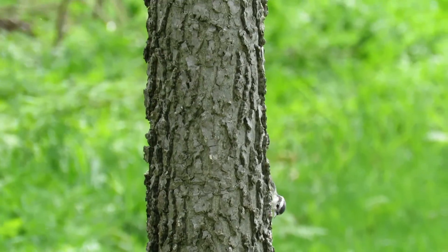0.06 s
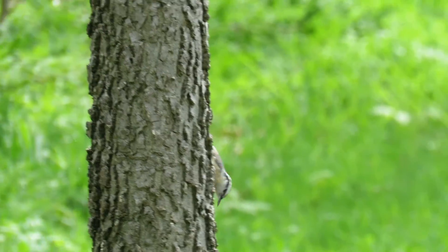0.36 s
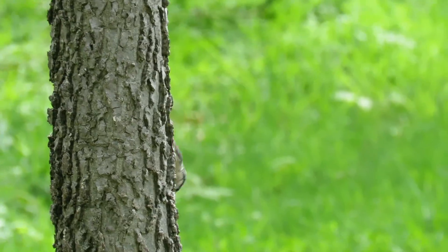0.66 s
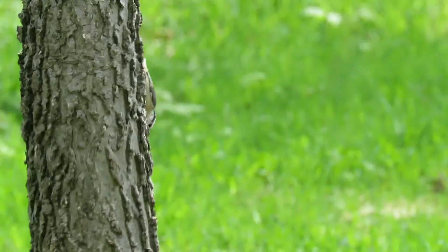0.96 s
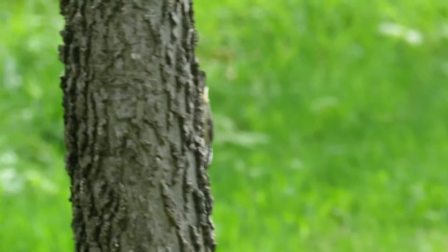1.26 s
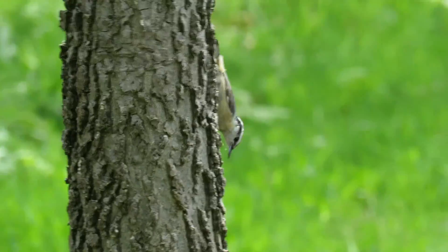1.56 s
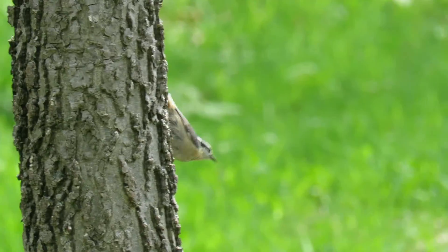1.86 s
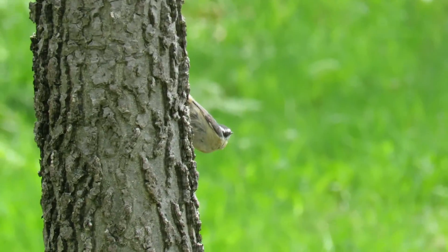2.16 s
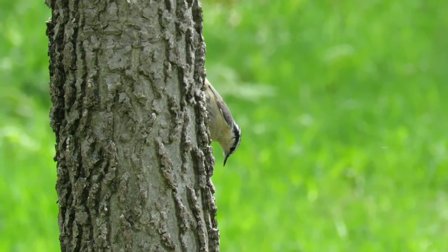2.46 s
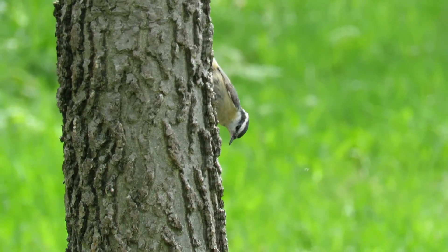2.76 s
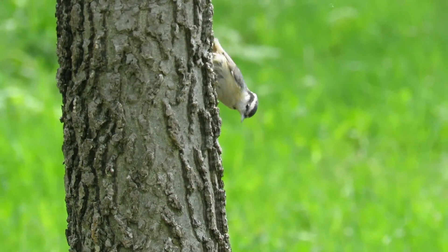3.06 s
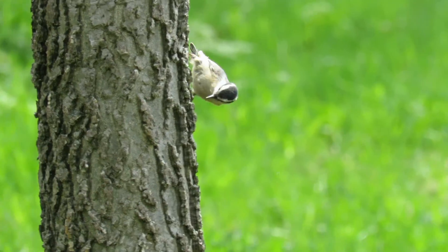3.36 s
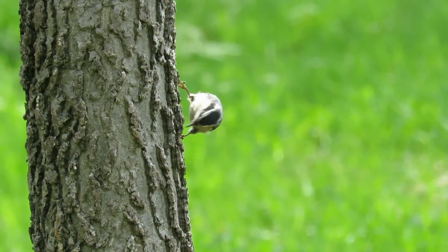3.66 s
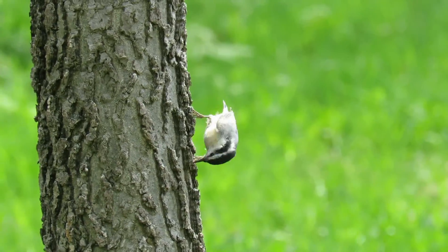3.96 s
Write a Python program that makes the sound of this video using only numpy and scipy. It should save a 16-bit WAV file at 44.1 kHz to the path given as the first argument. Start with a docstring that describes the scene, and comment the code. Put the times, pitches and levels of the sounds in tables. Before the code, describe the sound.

Light taps and clicks of camera handling over low outdoor rumble and faint bird chirps.

```python
"""Handling a camera in a garden

Fingers tap and slide on a hand-held camera: each impact excites the damped modes of its plastic
shell, and a small hard part ticks against it. Songbirds whistle and buzz, their calls scattered
by the trees. Behind them lie a low outdoor rumble, the wash of far traffic, a hiss of leaves and
air, and the very faint whine of the camera's mechanism."""
import sys
import numpy as np
from scipy import signal
from scipy.fft import rfft, irfft, next_fast_len
from scipy.io import wavfile
from scipy.ndimage import uniform_filter1d, map_coordinates

SR = 44100
rng = np.random.default_rng(int(sys.argv[2]) if len(sys.argv) > 2 else 0)


def wav_out(sig):
    """Save sig, one row per channel (or a flat mono array), as 16-bit PCM at SR to the path in sys.argv[1]."""
    wavfile.write(sys.argv[1], SR, np.round(np.clip(np.atleast_2d(sig).T, -1, 1) * 32767).astype(np.int16))


N = 176400


def amp(db):
    """Amplitude ratio of a level in decibels."""
    return 10 ** (np.asarray(db) / 20)


def unit_rms(x):
    """Normalisation to unit mean power."""
    return x / np.sqrt(np.mean(x ** 2) + 1e-20)


def on_log_axis(points, hz):
    """Interpolation of (frequency_hz, value) points over log frequency."""
    knots_hz, values = np.transpose(points)
    return np.interp(np.log(hz + 1), np.log(knots_hz + 1), values)


def curve(rows):
    """Linear interpolation of (time_s, value) rows at every sample."""
    return np.interp(np.arange(N) / SR, *np.transpose(rows))


def wobble(rate_hz):
    """Smooth random modulation: a spline through rate_hz Gaussian knots a second."""
    knots = rng.standard_normal(int(N * rate_hz / SR) + 4)
    return map_coordinates(knots, [np.arange(N) * rate_hz / SR])


def filtered(x, response):
    """Zero-phase filtering: the spectrum is multiplied by response(hz)."""
    n = x.shape[-1]
    padded = next_fast_len(n + 4096)
    return irfft(rfft(x, padded) * response(np.fft.rfftfreq(padded, 1 / SR)), padded)[..., :n]


def pan(db):
    """Level-difference panning: left exceeds right by db."""
    return amp(np.array([[db], [-db]]) / 2)


def add(out, start_s, x):
    """Superposition of x on out from start_s."""
    part = out[..., max(round(start_s * SR), 0):][..., :x.shape[-1]]
    part += x[..., :part.shape[-1]]


# Left-right coherence of the noise: frequency_hz, correlation
COHERENCE = [(110, 1), (200, .92), (300, .6), (430, .25), (830, .53), (1600, .2), (3000, .1), (6000, -.1),
             (11400, -.17)]

def noise_field(spectrum, patchy_db):
    """Partly coherent stereo noise of unit rms, its gain varying in time-frequency patches."""
    cells = signal.stft(rng.standard_normal((2, N)), nperseg=512)[2]
    patches = uniform_filter1d(rng.standard_normal(cells.shape[1:]), size=5, axis=0)
    patches = uniform_filter1d(patches, size=14, axis=1)
    pair = signal.istft(cells * amp(patchy_db * unit_rms(patches)), nperseg=512)[1][:, :N]

    def mid_side_gains(hz):
        angle = np.arccos(on_log_axis(COHERENCE, hz)) / 2
        return amp(on_log_axis(spectrum, hz)) * [np.cos(angle), np.sin(angle)]
    mid, side = filtered(pair, mid_side_gains)
    return unit_rms(np.array([mid + side, mid - side]))


# Spectrum of the rumble: frequency_hz, gain_db
RUMBLE_SPECTRUM = [(12, -38), (20, -16), (91, 2), (119, -0.5), (206, -13.5), (282, -13.5), (400, -17.5),
                   (520, -53), (880, -120)]
# Its slow drift: time_s, level_db
RUMBLE_DRIFT = [(0, -50), (.6, -49), (1.2, -50.5), (2.1, -53), (2.6, -53), (3.4, -54), (3.75, -51.5),
                (4, -54.5)]

def rumble():
    """Low outdoor noise: long waves reach both channels nearly in phase."""
    return amp(curve(RUMBLE_DRIFT) + 0.35 * wobble(5.3)) * noise_field(RUMBLE_SPECTRUM, patchy_db=0.2)


# Spectrum of far traffic: frequency_hz, gain_db
TRAFFIC_SPECTRUM = [(90, -24), (150, -4), (200, -6), (290, -5.5), (390, -9.5), (520, -10.5), (680, -8.5),
                    (840, -6), (1040, -8), (1250, -12.5), (1600, -18), (1900, -24), (2400, -27),
                    (3200, -55.5)]
# Its slow drift: time_s, relative_level_db
TRAFFIC_DRIFT = [(0.0, -58), (0.83, -54.5), (1.38, -56), (1.78, -55.5), (2.27, -55.5), (3.55, -57.5),
                 (4.0, -55.5)]

def traffic(gain_db=1):
    """Distant vehicles sum incoherently to a wash of noise with little treble."""
    level_db = curve(TRAFFIC_DRIFT) + gain_db + 0.65 * wobble(8.8)
    return amp(level_db) * noise_field(TRAFFIC_SPECTRUM, patchy_db=1.32)


# Spectrum of leaves and air: frequency_hz, gain_db
LEAF_SPECTRUM = [(1500, -30), (2200, -5.5), (3000, 2), (4000, -6), (5000, -5.5), (6200, -13.5),
                 (7400, -11.5), (8300, -17), (9200, -16), (11300, -23), (11800, -45)]

def leaves(level_db=-70):
    """Leaves and air give a faint broadband hiss."""
    return amp(level_db) * noise_field(LEAF_SPECTRUM, patchy_db=2.0)


# Tones of the camera's mechanism: pitch_hz, level_db
WHINE_TONES = [(5529, -95), (6648, -105), (7432, -103), (8151, -104)]

def camera_whine(jitter_rad=0.89):
    """The mechanism emits a line spectrum, each line broadened by random phase modulation."""
    t = np.arange(N) / SR
    return sum(amp(db) * np.sqrt(2) * np.sin(2 * np.pi * hz * t + jitter_rad * wobble(27))
               for hz, db in WHINE_TONES)


def tree_echo(x, t60_s=0.58, build_s=0.0033):
    """Scattering from trunks and leaves: convolution with exponentially decaying noise."""
    t = np.arange(SR) / SR
    tail = rng.standard_normal((2, SR)) * amp(-60 * t / t60_s) * (1 - np.exp(-t / build_s))
    return signal.fftconvolve(x[None], tail / np.linalg.norm(tail[0]), axes=1)[:, :N]


# Far buzzy calls: start_s, length_s, centre_hz, half_width_hz, level_db
BUZZ_CALLS = [(0.099, 0.16, 3400, 350, -77), (0.622, 0.42, 4850, 400, -74), (1.077, 0.19, 3420, 230, -72),
              (1.724, 0.24, 4560, 423, -68), (1.682, 0.26, 3350, 304, -68.5),
              (2.029, 0.1, 3550, 220, -68.5), (2.471, 0.29, 3750, 280, -76.5),
              (3.2, 0.11, 3300, 550, -66.5), (3.411, 0.19, 3670, 300, -69.5), (3.849, 0.41, 4550, 600, -77),
              (3.87, 0.38, 3170, 350, -73)]

def bird_buzzes(rise_share=0.28, onset_boost_db=2):
    """Rough calls, blurred by the trees, arrive as swells of narrow-band noise."""
    out = np.zeros((2, N))
    for start_s, length_s, centre_hz, half_width_hz, db in BUZZ_CALLS:
        u = np.linspace(0, 1, int(length_s * SR))
        noise = rng.standard_normal((2, SR // 2)) + rng.standard_normal(SR // 2)
        band = filtered(noise, lambda hz: 1 / np.sqrt(1 + ((hz - centre_hz) / half_width_hz) ** 4))
        swell = np.sqrt(np.interp(u, [0, rise_share, 1], [0, 1, 0])) * amp(onset_boost_db * (1 - u))
        add(out, start_s, amp(db) * unit_rms(band)[:, :len(u)] * swell)
    return out


WAVER_RATE_HZ, FLUTTER_RATE_HZ, FLUTTER_DB, BIRD_PAN_DB = 210, 90, 1.3, 5
# Short bird notes: start_s, length_s, first_hz, middle_hz, last_hz, level_db, echo_share
SHORT_NOTES = [(.53, 0.077, 3950, 3760, 3600, -74, 0.7), (0.593, 0.096, 3000, 2800, 2700, -73.5, .75),
               (0.802, 0.055, 3750, 3930, 4320, -70, 0.6), (1.08, .11, 3600, 3400, 3310, -71.5, 0.7),
               (1.193, .08, 3050, 2850, 2890, -67.5, 0.4), (1.357, .09, 5950, 6020, 6130, -81.5, 0.4),
               (2.084, .035, 3350, 3760, 3670, -69, .3), (2.149, 0.12, 1980, 2125, 2360, -73.5, 0.06),
               (2.474, 0.075, 4000, 3910, 4000, -74, 0.5), (2.744, .08, 2100, 1950, 1880, -81, .3),
               (2.882, 0.036, 2550, 2650, 2700, -72, .5), (3.36, .075, 3650, 3115, 2800, -68, 0.1),
               (3.404, 0.038, 3950, 3910, 3970, -72, 0.4), (3.44, .09, 2680, 2550, 2590, -75, 0.2),
               (3.555, 0.032, 3200, 2990, 2800, -69, 0.2), (3.94, .07, 3300, 3050, 2880, -75, .95)]

def bird_notes(waver_depth=0.0082, echo_db=2.5):
    """Tones glide along parabolas; the direct-to-reverberant ratio falls with a bird's distance."""
    out = np.zeros((2, N))
    waver = 1 + waver_depth * wobble(WAVER_RATE_HZ)
    flutter = amp(FLUTTER_DB * wobble(FLUTTER_RATE_HZ))
    for start_s, length_s, first_hz, middle_hz, last_hz, db, echo_share in SHORT_NOTES:
        u = np.linspace(0, 1, int(length_s * SR))
        arc = np.polyfit([0, .5, 1], [first_hz, middle_hz, last_hz], 2)
        pitch_hz = np.polyval(arc, u) * np.roll(waver, -int(start_s * SR))[:len(u)]
        envelope = amp(db) * signal.windows.tukey(len(u), 0.46)
        note = envelope * np.sqrt(2) * np.sin(2 * np.pi * np.cumsum(pitch_hz) / SR)
        add(out, start_s, np.sqrt(1 - echo_share) * pan(BIRD_PAN_DB) * note)
        add(out, start_s, np.sqrt(echo_share) * amp(echo_db) * tree_echo(note))
    return out * flutter


# Clear whistled phrases, each a run of points: time_s, pitch_hz, level_db
SONG_PHRASES = [
    [(.413, 5700, -86), (.445, 5525, -73), (.478, 5530, -70.5), (.495, 5570, -79), (.53, 5580, -76),
     (.58, 5500, -90)],
    [(1.415, 2470, -78), (1.435, 2800, -72), (1.465, 2560, -73), (1.5, 2434, -70), (1.545, 2420, -74),
     (1.575, 2155, -71), (1.635, 2180, -74), (1.66, 2190, -83)],
    [(1.878, 3850, -81), (1.9, 3530, -64), (1.928, 3060, -55.5), (1.947, 2860, -57.5), (1.96, 2677, -69.5),
     (2.025, 2543, -66), (2.048, 2700, -69.5), (2.074, 3180, -62.5), (2.087, 3015, -54.5),
     (2.102, 2870, -64), (2.119, 2790, -72)],
    [(2.658, 3120, -76), (2.678, 2880, -76), (2.692, 2810, -67), (2.722, 2790, -63.5), (2.738, 2810, -80)],
    [(3.162, 3044, -73), (3.175, 2727, -70), (3.19, 2883, -70), (3.205, 3250, -59), (3.222, 3190, -61),
     (3.234, 2800, -61.5), (3.25, 2750, -62), (3.259, 3580, -70), (3.27, 4020, -71), (3.288, 3750, -73)],
    [(3.204, 3610, -68), (3.215, 3690, -69), (3.235, 3610, -64.5), (3.243, 3950, -73), (3.25, 4450, -79),
     (3.262, 4660, -70), (3.271, 4780, -80)],
]

def birdsong(edge_s=0.0049, waver_depth=0.0037, echo_db=-9, trunk_delay_s=0.025, trunk_db=-16):
    """Whistles modulated in frequency and amplitude, with diffuse echo and one trunk reflection."""
    song = np.zeros(N)
    for phrase in SONG_PHRASES:
        time_s, hz, db = np.transpose(phrase)
        start_s, end_s = time_s[0], time_s[-1]
        t = start_s + np.arange(int((end_s - start_s) * SR)) / SR
        pitch_hz = np.interp(t, time_s, hz) * (1 + waver_depth * wobble(WAVER_RATE_HZ)[:len(t)])
        edges = np.clip(np.minimum(t - start_s, end_s - t) / edge_s, 0, 1)
        envelope = amp(np.interp(t, time_s, db)) * edges
        add(song, start_s, envelope * np.sqrt(2) * np.sin(2 * np.pi * np.cumsum(pitch_hz) / SR))
    song *= amp(FLUTTER_DB * wobble(FLUTTER_RATE_HZ))
    out = pan(BIRD_PAN_DB) * song + amp(echo_db) * tree_echo(song)
    add(out, trunk_delay_s, amp(trunk_db) * song)
    return out


# Skin sliding on the shell: start_s, length_s, level_db
GRIP_SHIFTS = [(0.98, 0.14, -60), (1.684, 0.21, -56)]
# Spectrum of the rubbing: frequency_hz, gain_db
FRICTION_SPECTRUM = [(200, -23), (400, 4), (750, -13), (1100, 2), (1600, -5), (2200, -16), (3100, -16.5),
                     (5000, -39), (9000, -43)]

def finger_slides():
    """Sliding friction makes soft, uneven noise as the grip shifts."""
    envelope = np.zeros(N)
    for start_s, length_s, db in GRIP_SHIFTS:
        add(envelope, start_s, amp(db) * signal.windows.tukey(int(length_s * SR), .6))
    return envelope * amp(2.5 * wobble(70)) * noise_field(FRICTION_SPECTRUM, patchy_db=3)


def ring(modes, t, emphasis_db=lambda hz: 0, scatter_rad=0.65):
    """Damped free vibration: each mode reaches the two microphone ports at unequal phase and level."""
    out = np.zeros((2, len(t)))
    for hz, db, t60_s in modes:
        phase = rng.uniform(0, 2 * np.pi) + scatter_rad * rng.standard_normal((2, 1))
        onset_db = db + emphasis_db(hz) + rng.normal(0, 1.8, (2, 1))
        out += amp(onset_db - 60 * t / t60_s) * np.sin(2 * np.pi * hz * t + phase)
    return out


IMPACT_ATTACK_S = 0.00056
# Modes of a small hard part: pitch_hz, gain_db, t60_s
PART_MODES = [(6030, 0.5, 0.0077), (6780, -2.5, 0.014), (7300, -7, 0.011), (9400, -15, .012),
              (11200, -18, 0.0092)]
# Its strikes on the shell: start_s, level_db, pan_db
PART_STRIKES = [(0.8742, -49.5, 9), (1.5502, -50.5, 14), (1.6072, -61, 1), (1.6769, -55.5, 2)]

def part_ticks(crack_above_hz=5200, crack_db=-4.5, crack_t60_s=0.0075):
    """A hard, brief impact excites high modes and a burst of treble noise."""
    out, t = np.zeros((2, N)), np.arange(SR // 20) / SR
    attack = 1 - np.exp(-t / IMPACT_ATTACK_S)
    for start_s, db, pan_db in PART_STRIKES:
        treble = filtered(rng.standard_normal((2, len(t))), lambda hz: hz > crack_above_hz)
        crack = unit_rms(treble) * amp(crack_db - 60 * t / crack_t60_s)
        add(out, start_s, amp(db) * pan(pan_db) * (ring(PART_MODES, t) + crack) * attack)
    return out


# Modes of the plastic shell: pitch_hz, gain_db, t60_s
SHELL_MODES = [(423, -4.5, 0.056), (633, -3.5, 0.034), (747, 1.5, 0.036), (820, -1.5, 0.023),
               (951, 3.5, 0.045), (1148, -3, 0.044), (1286, 3, 0.022), (1542, -3.5, 0.043),
               (1700, -0.5, 0.02), (3100, -1.5, 0.019), (4550, -14.5, 0.015), (6600, -29, 0.014)]
# Contact noise of skin on plastic: frequency_hz, gain_db
CONTACT_SPECTRUM = [(200, -10), (900, 4), (1600, 10), (2300, -2), (3200, -3), (5000, -15.5), (7500, -21.5),
                    (12000, -32)]
# Finger impacts: start_s, level_db, spot_hz, spot_boost_db, treble_tilt_db_per_octave, pan_db
FINGER_TAPS = [(0.5639, -57, 930, 12.5, -1, -6), (.955, -60.5, 920, 14.5, -15, -5),
               (.9625, -58.5, 790, 16, -16, -4), (.970, -61, 770, 16, -16, -5),
               (.9915, -56.5, 3350, 11, 7, 6), (1.008, -59.5, 795, 15, -2, -3),
               (1.060, -59, 840, 12, 1, -4), (1.0822, -44.5, 585, 14.5, 0, 1), (1.095, -62, 840, 5, -3, 0),
               (1.5485, -51.5, 1550, 6, -1, 8), (1.551, -45, 940, 2, 0.5, -8),
               (1.5535, -53.5, 2160, 25, -3, 9), (1.5565, -53, 410, 16.5, -2, 1),
               (1.6775, -44, 1360, 11, 3.5, -1), (1.7875, -48.5, 900, 3, -2, -2),
               (1.795, -55.5, 760, 15.5, -3, -5)]

def finger_taps(spot_octaves=0.32, split_hz=2800, thud_db=1, thud_t60_s=.035,
                snap_db=3.5, snap_peak_s=0.0024):
    """Impact excitation: the spot touched favours modes near spot_hz; contact noise dies treble first."""
    out, t = np.zeros((2, N)), np.arange(SR // 8) / SR
    attack = 1 - np.exp(-t / IMPACT_ATTACK_S)
    snap_envelope = amp(snap_db) * (t / snap_peak_s) ** 2 * np.exp(2 - 2 * t / snap_peak_s)
    for start_s, db, spot_hz, boost_db, tilt, pan_db in FINGER_TAPS:
        def emphasis_db(hz):
            bell = np.exp(-.5 * (np.log2((hz + 1) / spot_hz) / spot_octaves) ** 2)
            return boost_db * bell + tilt * np.log2(np.maximum(hz / spot_hz, 1))
        noise = rng.standard_normal((2, len(t))) + rng.standard_normal(len(t))
        contact = unit_rms(filtered(noise, lambda hz: amp(on_log_axis(CONTACT_SPECTRUM, hz) + emphasis_db(hz))))
        thud = filtered(contact, lambda hz: 1 / (1 + (hz / split_hz) ** 6))
        snap = (contact - thud) * snap_envelope
        body = ring(SHELL_MODES, t, emphasis_db) + thud * amp(thud_db - 60 * t / thud_t60_s)
        add(out, start_s, amp(db) * pan(pan_db) * (body * attack + snap))
    return out


def scene():
    """Superposition of close handling, birds and the steady background."""
    handling = finger_taps() + part_ticks() + finger_slides()
    birds = birdsong() + bird_notes() + bird_buzzes()
    return rumble() + traffic() + leaves() + camera_whine() + birds + handling


def record(dry):
    """Band limiting: the camera acts as an ideal low-pass filter at 12 kHz."""
    return filtered(dry, lambda hz: hz < 12000)


dry = scene()
out = record(dry)
wav_out(out)
```